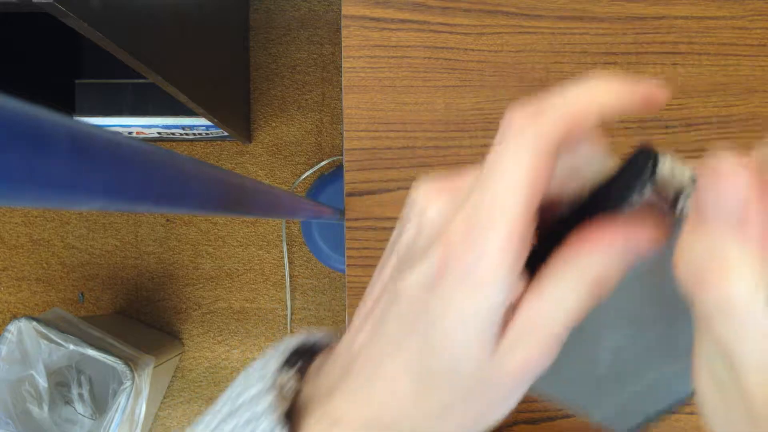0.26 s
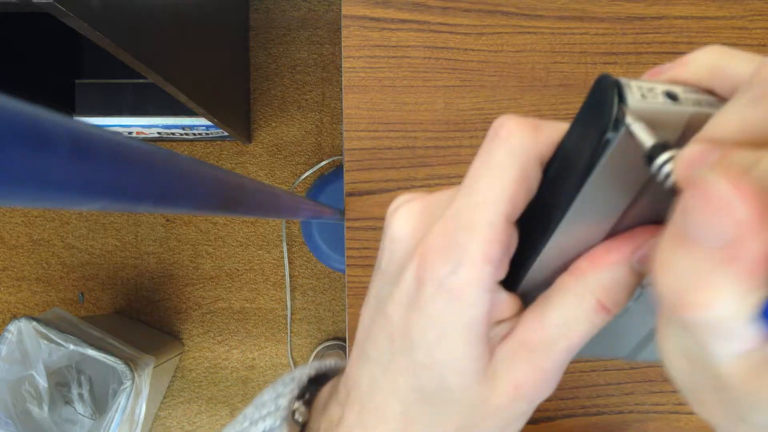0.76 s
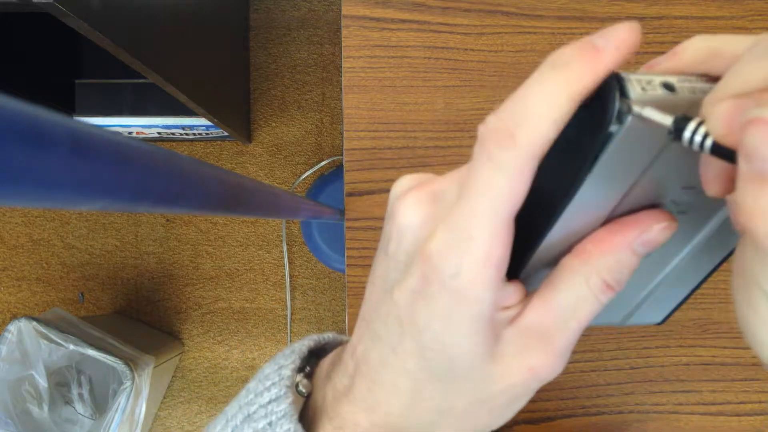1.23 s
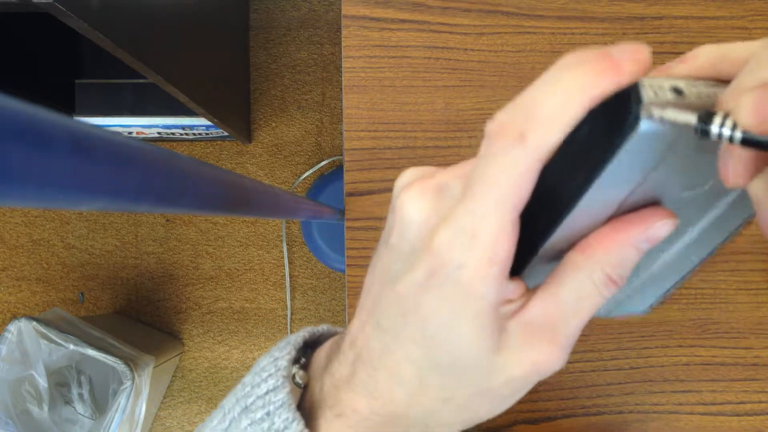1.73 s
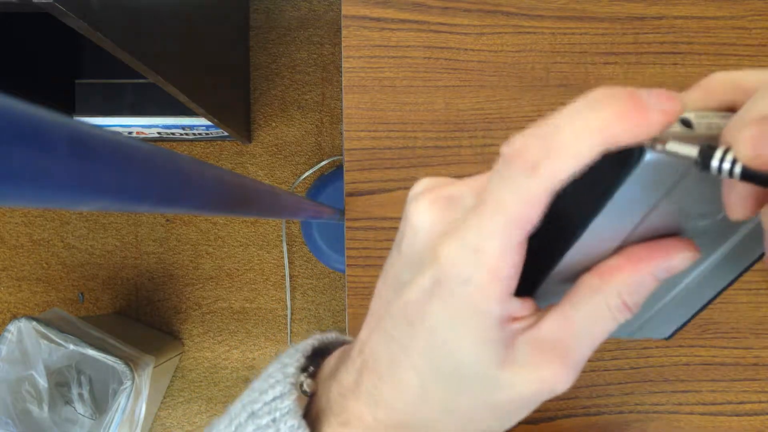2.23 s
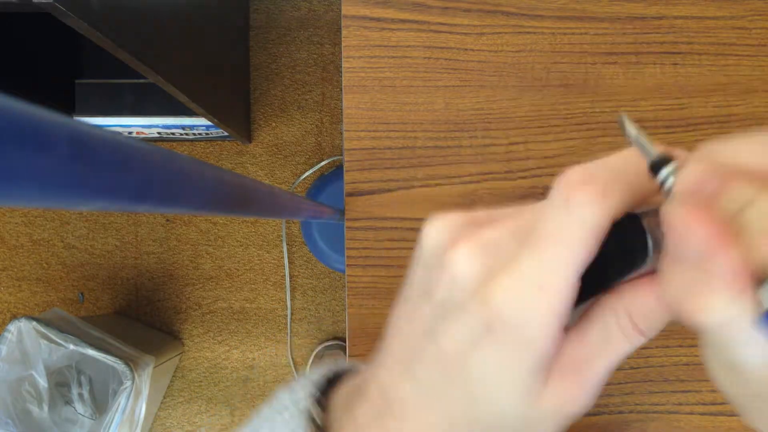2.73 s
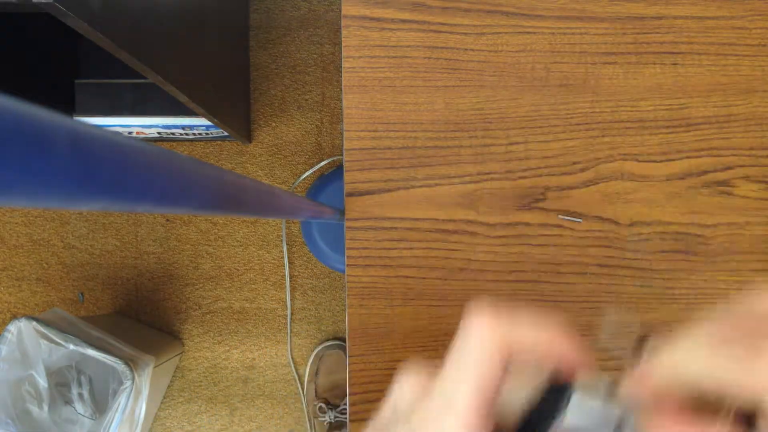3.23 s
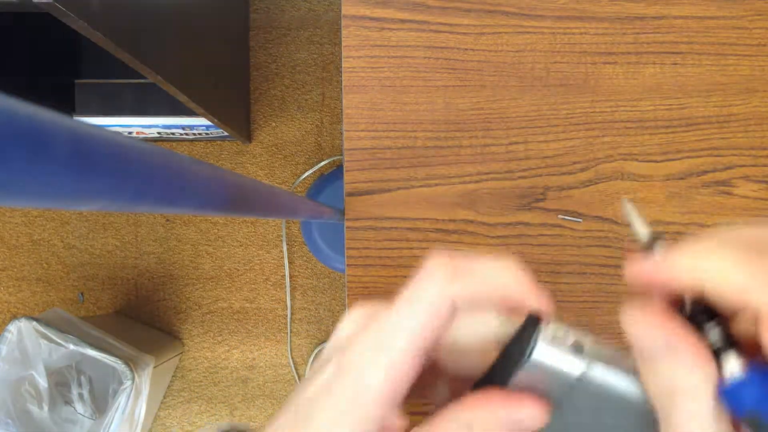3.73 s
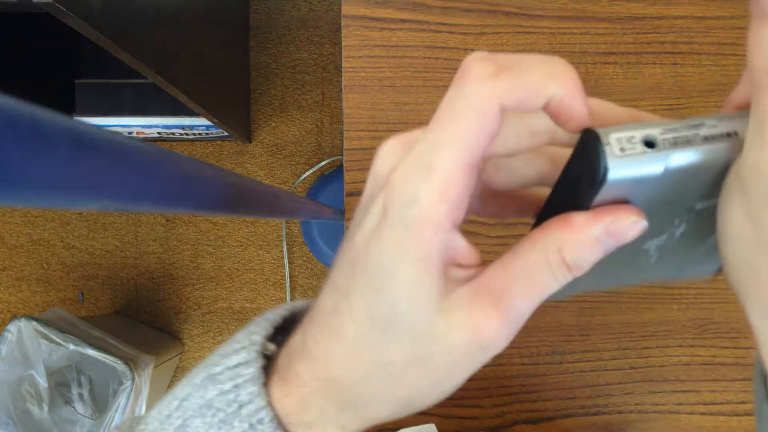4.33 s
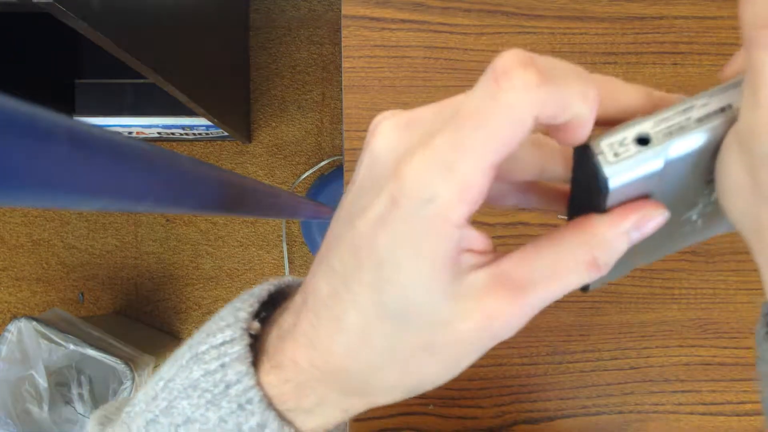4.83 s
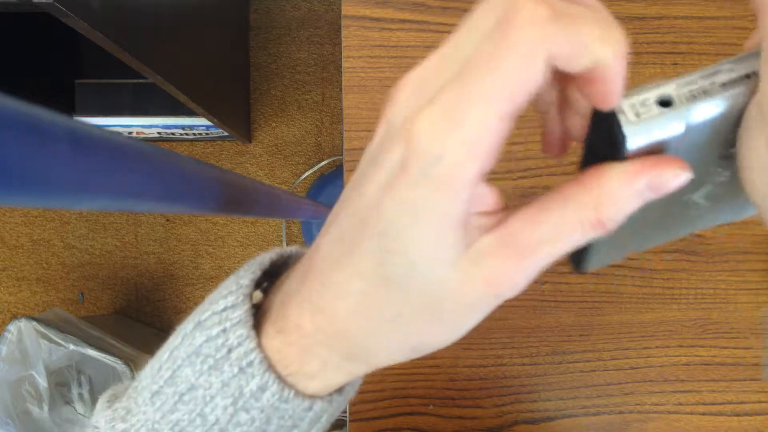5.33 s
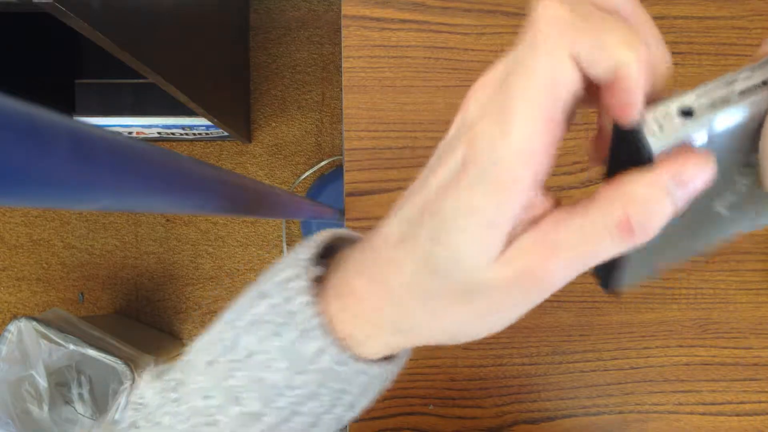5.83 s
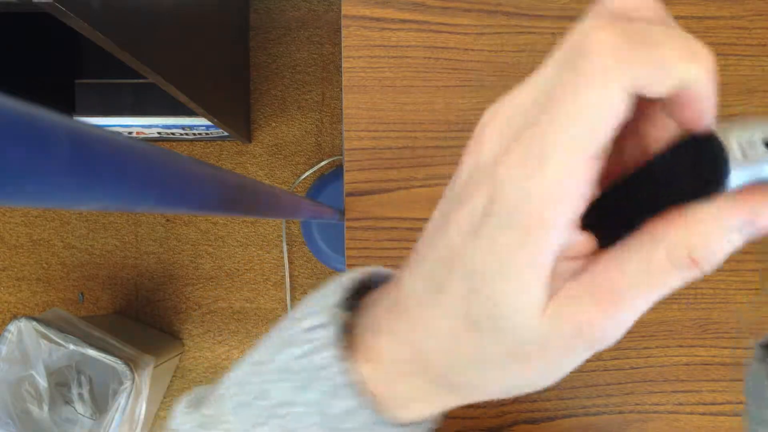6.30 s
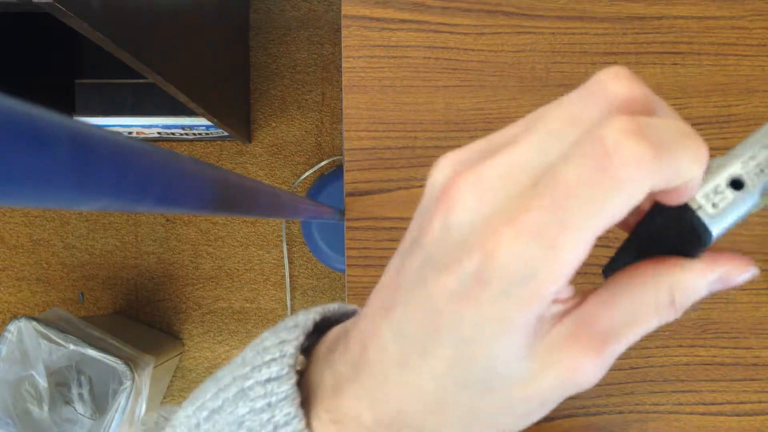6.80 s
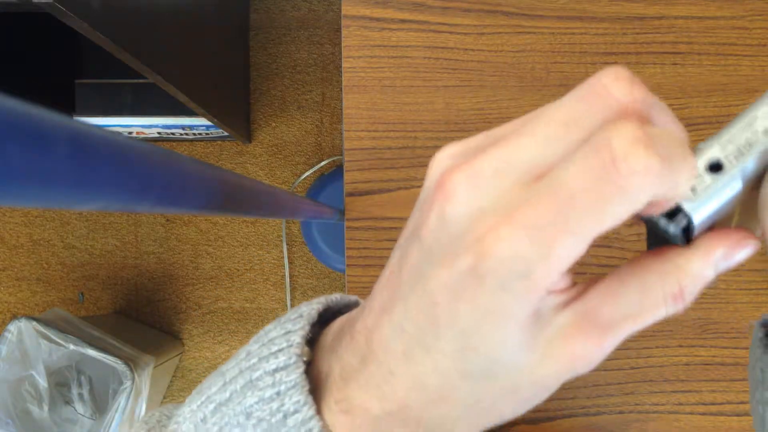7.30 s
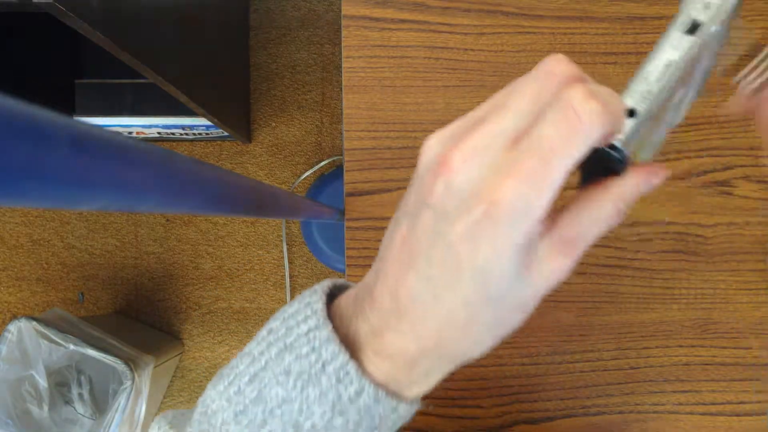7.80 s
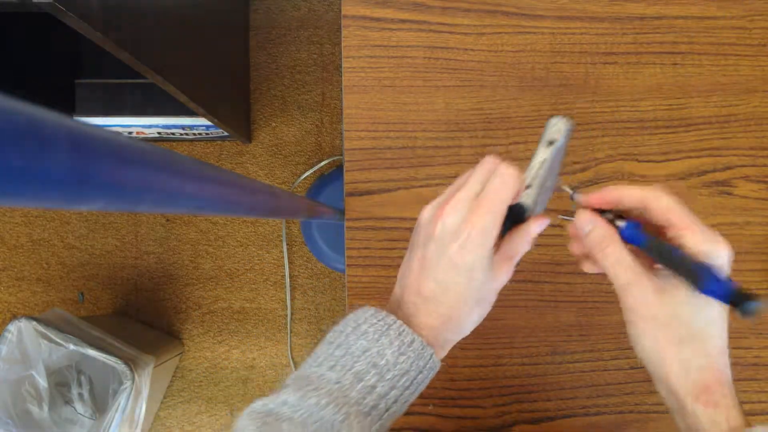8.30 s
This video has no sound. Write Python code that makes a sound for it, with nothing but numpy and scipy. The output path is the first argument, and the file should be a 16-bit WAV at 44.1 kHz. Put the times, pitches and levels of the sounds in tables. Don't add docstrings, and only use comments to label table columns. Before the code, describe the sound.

Close to a small microphone in a small room, hands rub a plastic case while a screwdriver tip bumps, ticks and creaks in its seam. A very loud crack comes early, then a scraping flurry with a strong snap, another sharp crack midway, and quieter handling. Late on, the cap slips in a rapid run of tiny clicks before a hard crack and several smaller snaps. A faint low fan hum lies underneath.

```python
import sys
import numpy as np
from scipy import signal
from scipy.fft import rfft, irfft, next_fast_len
from scipy.io import wavfile
from scipy.ndimage import uniform_filter1d, map_coordinates

SR = 44100
rng = np.random.default_rng(int(sys.argv[2]) if len(sys.argv) > 2 else 0)


def digitize_waveform(pressure):
    field = np.atleast_2d(pressure).T
    bounded = np.clip(field, -1, 1)
    quanta = np.round(bounded * 32767).astype(np.int16)
    wavfile.write(sys.argv[1], SR, quanta)


def boost_factor(decibels):
    exponent = np.asarray(decibels, float) / 20
    return 10 ** exponent


N = 377055
SPAN = 16384
BINS = np.fft.rfftfreq(SPAN, 1 / SR)


def unit(x):
    return x / np.sqrt(np.mean(x ** 2, axis=-1, keepdims=True) + 1e-20)


def columns(rows):
    return [c[:, None] for c in np.transpose(rows)]


def along(points, hz):
    f, v = np.transpose(points)
    return np.interp(np.log(hz + 1), np.log(f + 1), v)


def wobble(rate):
    return map_coordinates(rng.standard_normal(int(N * rate / SR) + 4), [np.arange(N) * rate / SR])


def during(spans):
    t = np.arange(N) / SR
    return 1. * sum((t >= start) & (t <= end) for start, end in spans)


def peak(f, centre_hz, width_hz):
    return 1j * f * width_hz / (centre_hz ** 2 - f * f + 1j * f * width_hz)


def noise(gain):
    m = next_fast_len(N)
    return irfft(rfft(rng.standard_normal(m)) * gain(np.fft.rfftfreq(m, 1 / SR)), m)[:N]


def placed(times, sounds):
    at = np.round(np.asarray(times) * SR).astype(int)[:, None] + np.arange(sounds.shape[1])
    return np.bincount(at.ravel(), sounds.ravel(), N + SPAN)[:N]


def causal(gain):
    cepstrum = irfft(np.log(gain + 1e-6))
    cepstrum[:, 1:SPAN // 2] *= 2
    cepstrum[:, SPAN // 2 + 1:] = 0
    return np.exp(rfft(cepstrum))


# frequency in Hz, time to fade 60 dB in seconds.
ROOM_FADE = [(300, .3), (1500, 0.24), (5000, 0.23), (10000, .19), (15000, 0.17)]


def tails(count, rise, early):
    hz, t, z = signal.stft(rng.standard_normal((count, SPAN)), SR, nperseg=256)
    faded = z * boost_factor(-60 * t / along(ROOM_FADE, hz)[:, None])
    tail = signal.istft(faded, SR, nperseg=256)[1][:, :SPAN]
    t = np.arange(SPAN) / SR
    tail = tail * (1 + early * boost_factor(-60 * t / .06))
    tail = tail * (1 - np.exp(-t / rise)) * (t < .33)
    return tail / np.linalg.norm(tail, axis=1, keepdims=True)


def fractures(count, attack, t60):
    t = np.arange(1024) / SR
    shape = (1 - np.exp(-(t / attack) ** 2)) * boost_factor(-60 * t / t60)
    burst = rng.standard_normal((count, len(t))) * shape
    for _ in range(6):
        spectrum = rfft(burst)
        burst = shape * np.sign(irfft(spectrum / np.abs(spectrum)))
    return rfft(burst / np.linalg.norm(shape), SPAN)


def clicks(rows, colour, room_db, attack, t60, rise, early, blur_hz, dull_hz):
    s, db = np.transpose(rows)[:2]
    burst = fractures(len(s), attack, t60)
    near = causal(colour / (np.abs(burst) + .1) ** .85) * burst
    blurred = uniform_filter1d(colour ** 2, 1 + int(blur_hz * SPAN / SR), axis=1)
    around = np.sqrt(np.abs(blurred)) / np.hypot(1, BINS / dull_hz)
    around = around * np.abs(burst) ** .4
    size = boost_factor(db[:, None]) / np.abs(irfft(near)).max(axis=1, keepdims=True)
    room = boost_factor(room_db) * causal(around) * rfft(tails(len(s), rise, early))
    return placed(s, size * irfft(near + room))


def colours(curves):
    return boost_factor([along(points, BINS) for points in curves])


def rung(modes, rise):
    s, db, hz, t60 = columns(modes)
    t = np.arange(2048) / SR
    loudness = boost_factor(db - 60 * t / t60) * (1 - np.exp(-t / rise))
    return placed(s[:, 0], loudness * np.sin(2 * np.pi * hz * t))


def plucked(modes):
    dry = rung(modes, rise=.0003)
    return dry + boost_factor(-13) * signal.fftconvolve(dry, tails(1, .0015, 4)[0])[:N]


def drags(s, length, db, hz, breadth):
    t = np.arange(SPAN) / SR
    grain_db = 4 * rng.standard_normal((len(s), SPAN // 32)).repeat(32, axis=1)
    grain = rng.standard_normal((len(s), SPAN)) * boost_factor(grain_db)
    drag = unit(irfft(rfft(grain) * peak(BINS, hz, hz * breadth * 1.2) ** 2))
    stroke = np.sin(np.pi * np.clip(t / length, 0, 1) ** 0.67) ** 1.2 * (t < length)
    drag = boost_factor(db) * unit(drag * stroke) * np.sqrt(np.mean(stroke ** 2, axis=1, keepdims=True))
    return placed(s[:, 0], irfft(rfft(drag) * (1 + boost_factor(-11) * rfft(tails(len(s), 0.00097, 0)))))


# pitch in Hz, width in Hz, level in dB.
CASE_MODES = [(850, 110, -1.5), (1260, 460, -3), (1550, 250, -1.5), (2100, 270, -3.5), (3570, 1400, -10)]


def case(f):
    return sum((-1) ** k * boost_factor(db) * peak(f, hz, width) for k, (hz, width, db) in enumerate(CASE_MODES))


# frequency in Hz, level in dB per Hz.
AIR_COLOUR = [(15, -58), (25, -28), (70, 1), (195, -18.5), (249, -31.5), (285, -29.5), (476, -33.5),
              (516, -33), (607, -38), (695, -39.5), (1330, -52.5), (14400, -62), (16000, -66.5)]


def air():
    return boost_factor(-64.5) * unit(noise(lambda f: boost_factor(along(AIR_COLOUR, np.maximum(f, 230))) * (f > 30)))


# pitch in Hz, width in Hz, level in dB.
DUCT_MODES = [(45, 10, -69.5), (63.17, 1.7, -60), (70.22, 4.6, -61.5), (101.9, 12, -70.5),
              (127.9, 20, -65.5), (153.8, 7.9, -70.5), (185.1, 7, -65.5), (203.6, 11, -71),
              (289.6, 9.4, -80.5)]


def duct():
    return sum(boost_factor(db) * unit(noise(lambda f: peak(f, hz, width) ** 2)) for hz, width, db in DUCT_MODES)


# start in seconds, end in seconds.
FAN_LOADED = [
    (0, 0.66),
    (1.08, 1.22),
    (2.55, 5.3),
    (5.38, 5.65),
    (6.38, 9.1),
]


def motor():
    t = np.arange(N) / SR
    loaded, sag_hz, fade_s = during(FAN_LOADED), 4, 0.079
    tired = sum((t >= start) * (t <= end) * (t - start) / (end - start) for start, end in FAN_LOADED)
    hz = 331 - sag_hz * np.maximum(tired, 1 - loaded) + 0.98 * wobble(3.7)
    db = -71.5 - 10.5 * (1 - uniform_filter1d(loaded, int(fade_s * SR)))
    return np.sqrt(2) * boost_factor(db + 2.5 * wobble(8)) * np.sin(2 * np.pi * np.cumsum(hz) / SR)


# middle in seconds, reach to either side in seconds, lift in dB.
GRIP_SWELLS = [(.21, 0.22, 13), (.5, 0.4, 13), (1.05, 0.27, 4.5), (1.88, 0.15, 8.5), (2.878, 0.17, 11),
               (3.4, 0.39, 13.5), (3.9, 0.26, 4), (4.2, 0.39, 5.5), (4.95, 0.27, 7.5), (5.22, 0.14, 5.5),
               (5.93, .12, 3), (6.2, 0.12, 9), (6.45, 0.31, 7), (7.17, .12, 2), (7.43, 0.12, 4),
               (7.76, 0.29, 1.5), (8.22, 0.2, 5.5), (8.499, 0.32, 6.5)]
# start in seconds, end in seconds.
STRAINS = [
    (1.1, 1.6),
    (2.13, 2.7),
]
# frequency in Hz, level in dB per Hz.
SKIN_COLOUR = [(2000, -120), (2500, -3.5), (4500, -1), (8000, 0), (13000, -4), (16000, -4)]


def grip():
    flurry, t = wobble(25), np.arange(N) / SR
    strained = during(STRAINS)
    lifts = [db * np.clip(1 - np.abs(t - s) / reach, 0, 1) for s, reach, db in GRIP_SWELLS]
    lift_db = np.max(lifts, axis=0)
    creak_db = -75.5 + lift_db + 3 * strained
    rustle_db = -75 + 0.92 * lift_db
    slips = strained * (rng.random(N) < 60 / SR) * rng.standard_normal(N) * 7
    shaken = slips + rng.standard_normal(N) * boost_factor(2 * flurry + 2.5 * wobble(150))
    f = np.fft.rfftfreq(N, 1 / SR)
    creak = unit(irfft(rfft(shaken) * case(f) * peak(f, 1800, 4000), N))
    rustle = unit(noise(lambda f: boost_factor(along(SKIN_COLOUR, f))) * boost_factor(2.4 * flurry + 1.7 * wobble(60)))
    return boost_factor(creak_db) * creak + boost_factor(rustle_db) * rustle


# start in seconds, length in seconds, level in dB.
PALM_RUBS = [(0, 0.033, -63.5), (0.101, 0.073, -76), (0.537, 0.084, -55), (0.68, 0.033, -64),
             (0.784, 0.037, -63), (1.032, 0.023, -48), (1.06, 0.039, -61), (2.682, 0.044, -61.5),
             (2.732, 0.069, -47.5), (2.89, 0.023, -63), (3.029, 0.016, -60), (3.065, 0.044, -61),
             (3.309, 0.14, -54.5), (3.475, 0.02, -64), (3.534, 0.082, -61.5), (4.105, 0.034, -65.5),
             (5.09, 0.059, -64), (5.249, 0.054, -62.5), (6.115, 0.021, -63.5), (6.287, 0.093, -62.5),
             (6.399, 0.018, -63), (6.803, 0.026, -64)]


def rubs():
    return drags(*columns(PALM_RUBS), hz=6000, breadth=1.8)


def touches(rows, thud_db, room_db):
    hz, edge_db = columns(rows)[2:4]
    thud = boost_factor(thud_db + 7.5) * peak(BINS, 520, 900) ** 2
    pitch = np.abs(peak(BINS, hz, hz / 3.7)) ** 1.6
    body = .25 * np.minimum(1, 3000 / hz) * peak(BINS, 2100, 3500) ** 2
    edge = boost_factor(edge_db - 8.5) * peak(BINS, 10000, 18000) ** 2
    colour = np.linalg.norm(np.broadcast_arrays(thud, pitch, body, edge), axis=0)
    colour = colour * (1 + 0.54 * np.abs(case(BINS)))
    return clicks(rows, colour, room_db, attack=0.0012, t60=0.011, rise=0.0015, early=4.0,
                  blur_hz=300.5, dull_hz=15300)


# start in seconds, peak in dB, shell pitch in Hz, bright edge in dB.
SHAFT_BUMPS = [(0.109, -43.5, 1630, -5), (0.176, -39, 2840, -7), (0.31, -51, 891, -27),
               (0.858, -51.5, 880, -9), (1.385, -50.5, 1020, -19), (1.548, -54.5, 1200, -20),
               (1.65, -45.5, 805, -13), (1.695, -50, 760, -14), (1.744, -39.5, 2490, -14),
               (2.177, -52, 1195, -26), (2.206, -54, 2060, -28.5), (2.368, -49, 992, -9),
               (2.874, -47.5, 5700, -14.5), (3.036, -44.5, 3740, -26), (3.064, -50, 1550, -22),
               (3.521, -48, 806, -19), (3.597, -46, 868, -29.5), (3.819, -51.5, 910, -18),
               (3.838, -46, 1500, -24), (4.052, -44.5, 1588, -17.5), (4.723, -60, 7400, -7),
               (5.083, -44, 806, -23), (5.204, -54, 1520, -15.5), (6.24, -50.5, 800, -17.5),
               (6.443, -48, 2240, -10), (6.799, -54, 2180, -6), (6.991, -48.5, 1090, -46)]


def bumps():
    return touches(SHAFT_BUMPS, thud_db=-11, room_db=-4.5)


# start in seconds, level in dB, pitch in Hz.
PANEL_PLUCKS = [(.121, -54, 1800), (.136, -52, 1300), (.167, -48, 800), (.177, -46, 2750), (.19, -49, 1700),
                (.193, -53, 3100), (.379, -46, 1500), (1.292, -57, 1100), (1.312, -52, 1400),
                (1.326, -52, 1050), (1.385, -50, 3700), (1.392, -48, 1300), (1.499, -50, 3700),
                (1.2108, -52, 4300), (2.762, -30, 1400), (1.426, -49, 1400), (1.452, -50, 2450),
                (1.459, -52, 1050), (1.471, -58, 1150), (1.482, -57, 1250), (1.547, -52, 1250),
                (1.572, -48, 1350), (1.625, -50, 1250), (1.65, -49, 1150), (1.696, -51, 1050),
                (2.207, -54, 2210), (2.259, -56, 2000), (2.263, -55, 1200), (2.315, -44, 1300),
                (2.328, -51, 1300), (2.337, -52, 2300), (2.366, -48, 1350), (2.4, -46, 1400),
                (2.479, -53, 1500), (2.864, -43.5, 2210), (3.029, -54, 1200), (3.082, -50, 1300),
                (3.319, -46, 2800), (3.3255, -40, 2430), (3.3255, -35, 3250), (3.3257, -32, 4260),
                (3.333, -46, 1000), (3.446, -56, 1500), (3.542, -50, 1000), (3.596, -47, 1900),
                (3.597, -53, 3510), (3.819, -50.5, 3000), (3.829, -46, 2600), (3.84, -51, 1303),
                (6.008, -48, 2600), (6.009, -56, 1405), (6.124, -56.5, 1500), (6.242, -54, 2100),
                (6.29, -53, 1900), (6.32, -55, 1900), (6.413, -53, 1500), (6.444, -52, 2200)]


def plucks():
    modes = []
    for s, db, low_hz in PANEL_PLUCKS:
        for ratio, more_db in ((1, 0), (1.7, -8)):
            hz = low_hz * ratio
            modes.append((s, db + more_db, hz, 14 / np.sqrt(hz * 1500)))
    return plucked(modes)


# start in seconds, peak in dB, shell pitch in Hz, bright edge in dB.
LIP_CREAKS = [(0.188, -44, 1520, -18), (1.311, -45.5, 2130, -8), (1.497, -49.5, 1240, -29),
              (2.314, -42.5, 1277, -38), (2.346, -45.5, 1370, -25), (2.438, -39.5, 1260, -27),
              (2.488, -49.5, 1170, -13), (2.864, -36.5, 6370, -4), (4.919, -51, 1970, -7.5),
              (4.953, -44, 2050, -1.5), (7.16, -53, 2900, -5), (7.184, -46, 5600, -3),
              (7.196, -50, 3800, -6), (7.208, -47, 5500, -3)]


def creaks():
    return touches(LIP_CREAKS, thud_db=-34, room_db=-9)


# start in seconds, length in seconds, level in dB, pitch in Hz.
SEAM_SCUFFS = [(0.196, 0.04, -58.5, 8060), (0.342, 0.058, -64, 4600), (1.154, 0.077, -63.5, 8900),
               (1.977, 0.066, -70.5, 8470), (2.122, .04, -67, 8870), (2.612, 0.021, -69, 8900),
               (2.757, 0.049, -49, 11000), (2.846, 0.038, -49.5, 9000), (2.947, 0.055, -65, 6900),
               (3.185, 0.094, -67.5, 4000), (3.319, 0.13, -55, 2410), (3.858, 0.011, -39.5, 2800),
               (5.209, 0.051, -66, 4040), (6.491, 0.066, -66.5, 4040), (6.703, 0.096, -63.5, 4860),
               (6.999, 0.032, -69.5, 4980), (7.055, 0.028, -69, 5000), (7.095, 0.055, -65.5, 6000)]


def scuffs():
    return drags(*columns(SEAM_SCUFFS), breadth=1.15)


# start in seconds, peak in dB, shell pitch in Hz, bright edge in dB.
TIP_TICKS = [(.444, -45, 1500, -6), (1.175, -45, 1590, -26.5), (1.21, -43.5, 1290, -35),
             (1.293, -53, 1300, -9), (1.47, -50.5, 1150, -21), (1.453, -46, 1150, -10),
             (1.594, -54, 1450, -21), (1.865, -40.5, 2250, -22), (1.887, -45.5, 2320, -21),
             (2.113, -36.5, 2210, -28.5), (2.117, -39, 1220, 0.5), (2.477, -48.5, 8700, -10),
             (2.65, -49.5, 1280, -28), (2.669, -43.5, 1260, -32), (2.703, -33.5, 790, -31),
             (2.7533, -25, 2000, -20), (2.7597, -26, 4900, 0), (2.842, -36, 5560, -8),
             (3.325, -40, 3300, -15), (4.929, -51.5, 6900, -4), (4.987, -56, 1260, -14),
             (6.009, -52.5, 2500, -28), (6.318, -50.5, 3800, -19), (7.092, -51.5, 2100, -15),
             (7.223, -50, 3000, -3), (7.328, -51.5, 2402, -4.5)]


def ticks():
    return touches(TIP_TICKS, thud_db=-17.5, room_db=-4.5)


# start in seconds, peak in dB, room level in dB.
HIDDEN_SNAPS = [
    (.452, -35, 20),
    (3.986, -37, 16.5),
    (5.421, -33.5, 17.5),
    (7.67, -33.5, 19),
    (8.131, -44.5, 15),
]
# frequency in Hz, level in dB per Hz.
HIDDEN_TONES = [
    [(290, -26), (500, -25), (705, -28), (2030, -12.5), (4470, -14.5), (5540, -1), (7480, -9), (12000, -7),
     (15300, -7.5)],
    [(290, -52), (500, -17), (790, -15), (1290, -12.5), (1790, -1), (3120, -9.5), (3980, -1), (6300, 3.5),
     (15300, -4)],
    [(290, -64), (500, -39), (1000, -14), (1900, -3), (2700, -7), (5000, -4), (7200, 2), (9000, -1),
     (12500, -2.5), (15300, -4.5)],
    [(290, -64), (500, -17), (629, -31.5), (1980, -12.5), (2870, -17), (5860, -4), (6670, -7.5), (8150, -5),
     (15300, -10)],
    [(290, -55.5), (500, -31), (1040, -7), (1800, -9.5), (2280, 3), (3080, -9.5), (5300, -7), (5750, 1),
     (6400, 1), (7600, -4), (8600, -14), (15300, -28.5)],
]


def hidden_snaps():
    return clicks(HIDDEN_SNAPS, colours(HIDDEN_TONES), columns(HIDDEN_SNAPS)[2], attack=0.00069, t60=0.02,
                  rise=0.0058, early=.1, blur_hz=60, dull_hz=40300)


# start in seconds, level in dB, pitch in Hz.
BLADE_RINGS = [
    (.453, -63, 5540),
    (7.671, -51.5, 5960),
    (8.018, -78, 6050),
]


def blade():
    s, db, hz = columns(BLADE_RINGS)
    t = np.arange(SPAN) / SR
    drift = 0.013 * np.cumsum(rng.standard_normal((len(s), SPAN)), axis=1)
    loudness = boost_factor(db - 60 * t / 0.34) * (1 - np.exp(-t / .004))
    return placed(s[:, 0], loudness * np.sin(2 * np.pi * hz * t + drift))


# start in seconds, length in seconds, level in dB, pitch in Hz.
NAIL_WHISTLES = [(1.034, 0.016, -44.5, 3680), (1.037, 0.018, -51, 5450), (1.035, .014, -51, 2350),
                 (1.057, 0.013, -62, 3660), (3.473, .016, -62, 4600), (.453, .03, -47, 6100),
                 (.53, .06, -60, 5400), (5.425, .04, -47, 7200), (3.99, .04, -55, 8300),
                 (5.96, .04, -72, 1350), (6.101, 0.058, -69, 1430), (7.1, 0.031, -67, 2130),
                 (7.12, 0.02, -68, 2900), (3.995, .07, -54, 6300), (3.99, 0.042, -56, 1800),
                 (4.579, .06, -69, 1370), (6.02, 0.062, -70.5, 1424), (6.903, 0.1, -73.5, 1430)]


def whistles():
    return drags(*columns(NAIL_WHISTLES), breadth=0.11)


# start in seconds, peak in dB, time for the break to fade 60 dB in seconds,
# room level in dB.
CATCH_SNAPS = [
    (0.915, -32.5, 0.01, -3),
    (2.392, -30, 0.0048, -6.5),
    (2.7468, -18, 0.013, -5),
    (7.3455, -20, .008, -4.5),
    (7.6266, -25, .004, -6),
    (8.016, -27, .014, -4),
]
# frequency in Hz, level in dB per Hz.
SNAP_TONES = [
    [(180, -43), (300, -7), (917, 2), (2340, -7.5), (2940, -20), (3640, -2.5), (4360, -12), (7880, -7),
     (15200, -26)],
    [(180, -37), (300, -12), (533, -12.5), (2220, -1), (3760, -17), (6060, -11), (8140, -19), (11300, -17),
     (15200, -28)],
    [(180, -60), (300, -26), (1600, -13.5), (2800, 1), (4510, -16), (7500, -15), (10900, -27), (13300, -16),
     (15200, -36)],
    [(180, -46), (300, -16), (1500, -10.5), (2080, 0.5), (3640, -14), (5770, -7.5), (7020, -19.5),
     (10100, -17), (15200, -36)],
    [(180, -45), (300, -22), (1600, 1), (4090, -17), (6690, 1), (7500, -12), (8420, -2.5), (11500, -8.5),
     (15200, -34)],
    [(180, -44), (300, -21), (917, -26), (2050, -16), (3580, -14), (6060, -3), (11900, -23), (13100, -13),
     (15200, -33)],
]


def snaps():
    return clicks(CATCH_SNAPS, colours(SNAP_TONES), columns(CATCH_SNAPS)[3], attack=.0009,
                  t60=columns(CATCH_SNAPS)[2], rise=0.0013, early=4.1, blur_hz=1500, dull_hz=16000)


# start in seconds, level in dB, pitch in Hz,
# time to fade 60 dB in seconds.
PANEL_RINGS = [(1.7635, -32.5, 3100, .02), (1.767, -24, 2240, .045), (4.7465, -13, 1555, .022),
               (4.7468, -22, 2850, .018), (4.7466, -18, 8010, .018), (4.747, -19, 6900, .012),
               (4.7468, -26, 5450, .02), (7.3455, -24.5, 2044, .045), (.9155, -33, 600, .022),
               (.9155, -34, 872, .022), (.9158, -41, 1120, .03), (.9155, -38, 1485, .02),
               (.9158, -37, 2234, .016), (.916, -34.5, 3555, .013), (3.861, -39, 647, .045),
               (3.861, -41, 940, .05), (3.862, -45, 1410, .03), (2.7498, -20, 2800, .009),
               (8.0177, -25, 6060, .011), (8.0163, -39, 4130, .016), (8.0163, -31, 5300, .012),
               (7.627, -34, 1580, .009), (7.627, -36, 950, .012), (3.8657, -20, 3650, .007),
               (3.8659, -25, 2950, .007)]


def rings():
    return rung(PANEL_RINGS, rise=.0005)


# start in seconds, length in seconds, level in dB, pitch in Hz.
PANEL_SQUEAKS = [(3.351, 0.016, -49.5, 890), (3.366, 0.05, -53, 940), (3.33, 0.033, -58, 2100),
                 (3.415, 0.033, -61, 2210), (3.467, 0.03, -60, 775), (3.33, .1, -59, 600),
                 (5.44, .18, -66, 1600), (.92, .05, -58, 900), (2.872, 0.011, -55, 1880),
                 (6.167, 0.077, -58, 11600), (6.172, 0.066, -53, 7480), (6.204, 0.088, -60, 540),
                 (6.34, .13, -64.5, 543), (7.102, .04, -63, 2204)]


def squeaks():
    return drags(*columns(PANEL_SQUEAKS), breadth=0.36)


# start in seconds, peak in dB, time for the break to fade 60 dB
# in seconds, room level in dB.
CAP_JUMPS = [
    (1.765, -2.5, .004, -6),
    (3.865, -21, 0.012, -6),
    (4.7464, -9.5, .01, -7),
    (7.3391, -10, 0.007, -8.5),
]
# frequency in Hz, level in dB per Hz.
JUMP_TONES = [
    [(180, -53), (300, -18), (874, -22.5), (1210, -5), (1550, -5), (2050, -9), (2300, 1.5), (3900, -1),
     (4500, -12), (7300, -16), (8100, -12), (9000, -17), (15300, -16)],
    [(180, -40), (300, -40), (639, -4), (1890, -20), (2720, -4), (3720, -2), (5250, -16.5), (7540, 0),
     (8190, -14), (10100, -4), (12600, -4), (15300, -7)],
    [(200, -51), (400, -14), (1150, -14), (1550, -6), (2300, -20), (2850, -8), (4200, -12.5), (7000, -3.5),
     (8300, -5), (10500, -19), (13000, -7.5), (15300, -27)],
    [(180, -33.5), (850, -21.5), (1200, -9), (2100, -3), (2700, -12), (3200, -1), (4000, -17), (5300, -12),
     (6300, -15), (6800, -5.5), (7200, -23), (10100, -15), (15300, -27.5)],
]


def jumps():
    return clicks(CAP_JUMPS, colours(JUMP_TONES), columns(CAP_JUMPS)[3], attack=0.0012,
                  t60=columns(CAP_JUMPS)[2], rise=.0015, early=2.1, blur_hz=1600, dull_hz=8000)


# start in seconds, level in dB.
TEETH = [
    (7.1603, -39.5),
    (7.1843, -37),
    (7.1963, -39),
    (7.2085, -38),
    (7.2235, -45.5),
]
# pitch in Hz, level in dB, time to fade 60 dB in seconds.
CAP_MODES = [(2100, -2.5, .014), (3000, -3, .007), (1210, -14.5, .015), (4900, -11.5, .008)]


def ratchet():
    return plucked([(s, db + level, hz, t60) for s, db in TEETH for hz, level, t60 in CAP_MODES])


def scene():
    room = air() + duct() + motor()
    hands = grip() + rubs() + scuffs() + whistles() + squeaks()
    tip = bumps() + plucks() + creaks() + ticks() + blade()
    catches = hidden_snaps() + snaps() + rings() + jumps() + ratchet()
    return (room + hands + tip + catches)[None]


def band_limit(x):
    return signal.sosfilt(signal.butter(12, 16500, fs=SR, output="sos"), x)


def record(dry):
    over = np.clip((np.fft.rfftfreq(N, 1 / SR) - 15200) / 250, 0, 1)
    mix = irfft(rfft(dry) * boost_factor(-30 * over), N)
    return band_limit(mix)


dry = scene()
out = record(dry)
digitize_waveform(out)
```